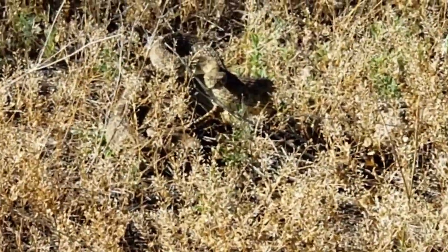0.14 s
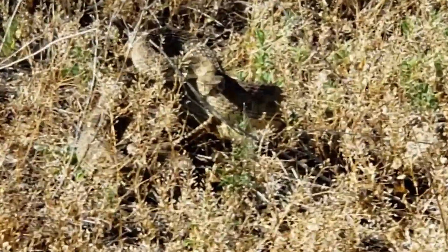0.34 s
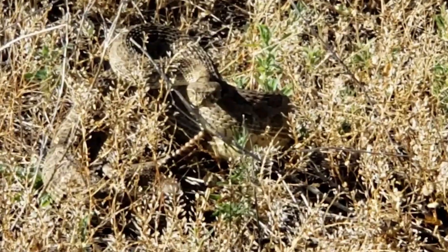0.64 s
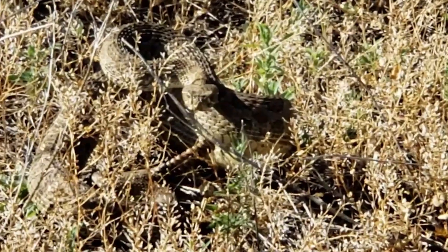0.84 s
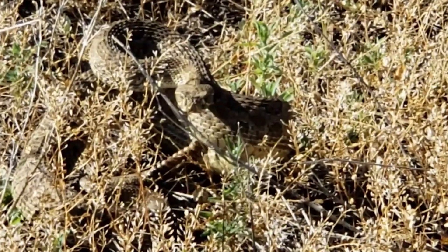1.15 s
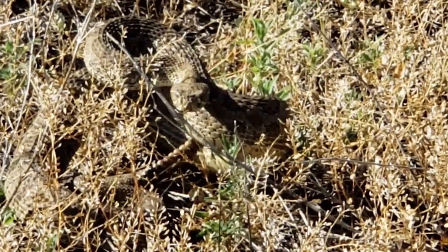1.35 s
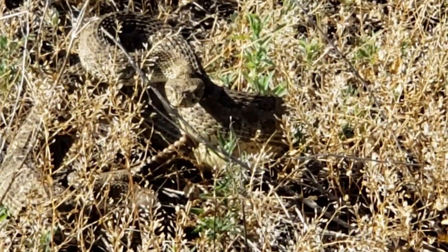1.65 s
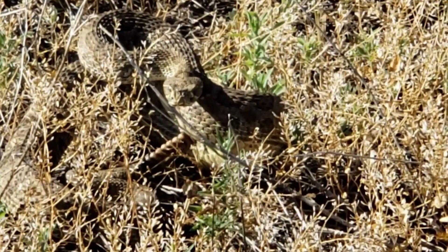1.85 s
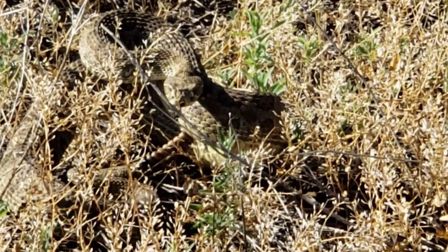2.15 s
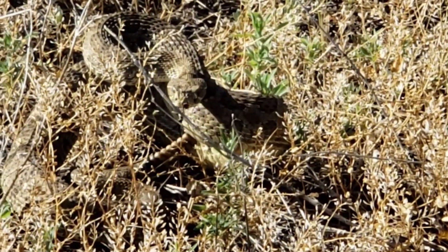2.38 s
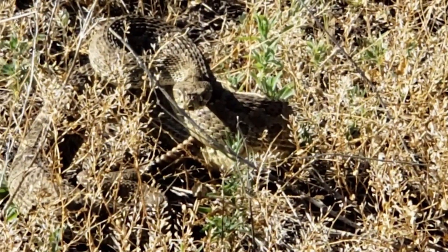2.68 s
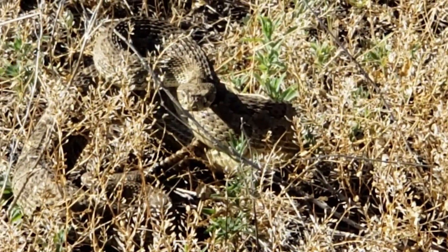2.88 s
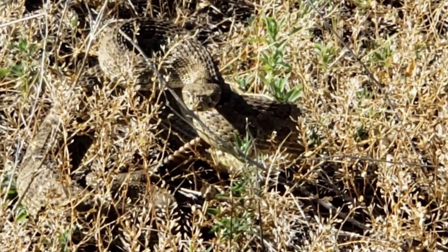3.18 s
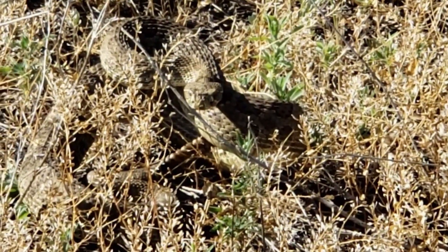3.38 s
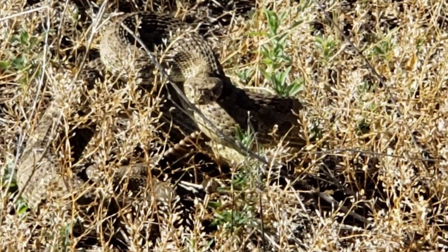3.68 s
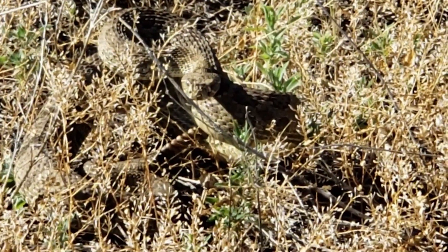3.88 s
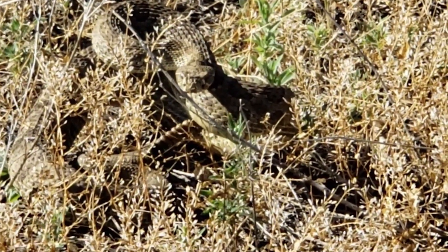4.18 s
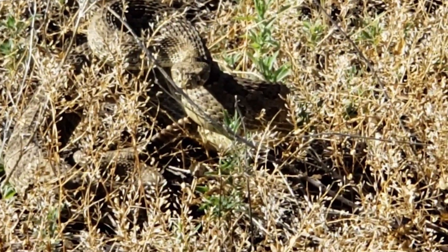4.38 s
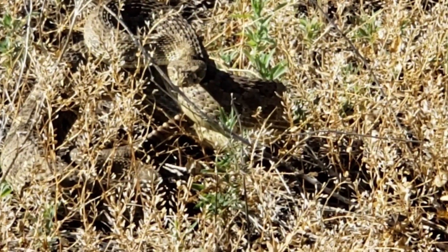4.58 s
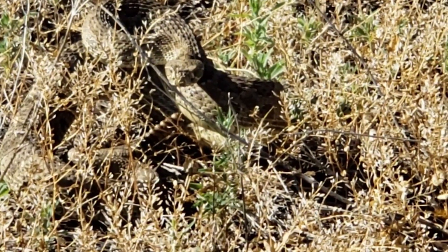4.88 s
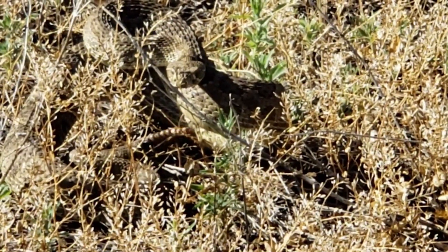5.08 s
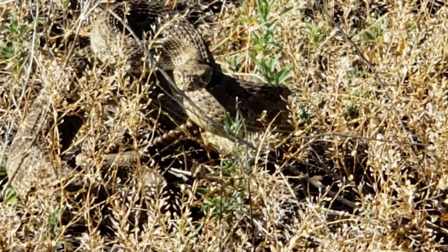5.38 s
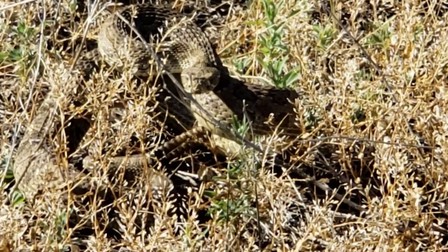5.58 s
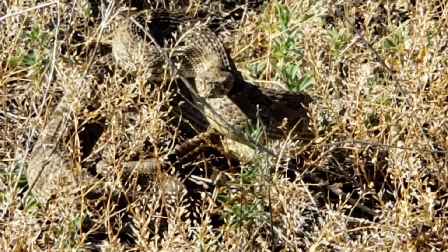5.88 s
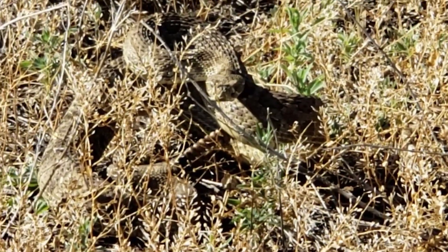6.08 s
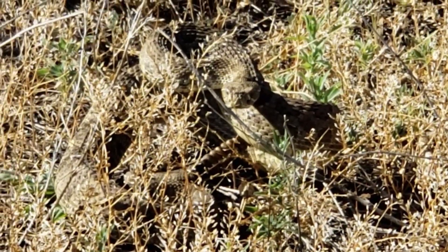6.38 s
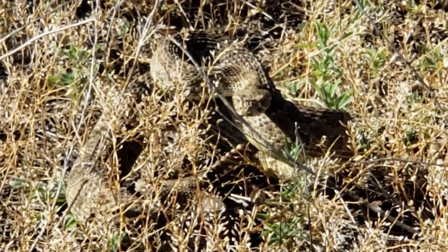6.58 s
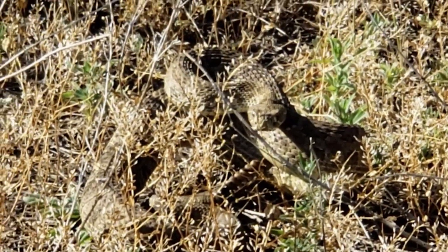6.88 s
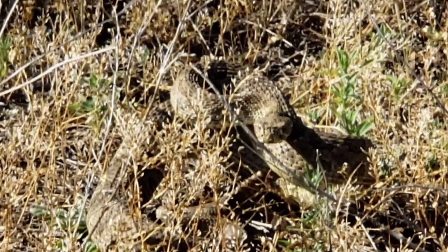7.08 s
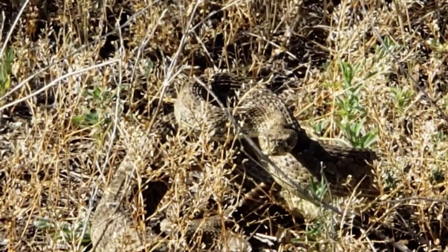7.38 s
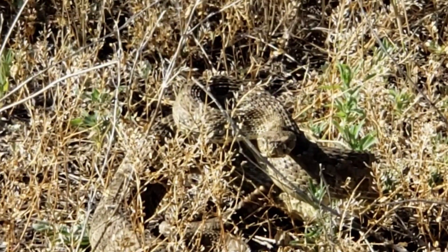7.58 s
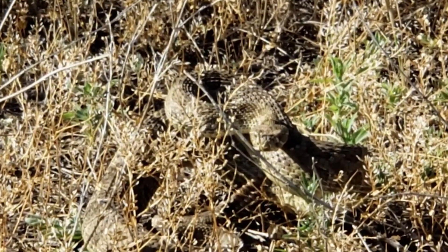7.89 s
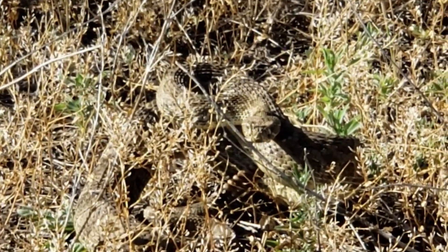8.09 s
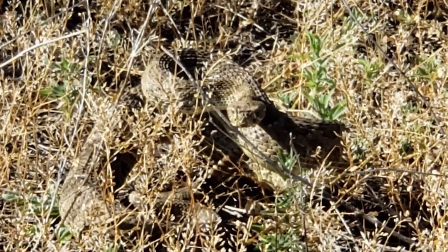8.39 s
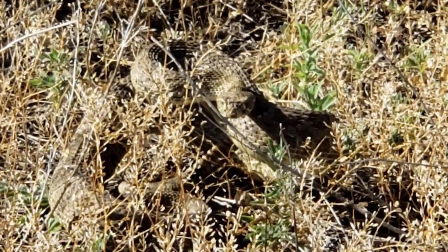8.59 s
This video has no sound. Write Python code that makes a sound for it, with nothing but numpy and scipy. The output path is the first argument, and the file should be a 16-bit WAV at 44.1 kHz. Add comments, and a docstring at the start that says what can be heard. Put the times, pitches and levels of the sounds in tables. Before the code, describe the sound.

Dense, papery clicks blur into an insistent high rattle, with fine treble sizzle spread across stereo. The level sags after four seconds, stutters near five and builds back up. A handheld microphone picks up short grainy friction on the left, then several dry stems snap loudly between about 6.4 and 6.7 seconds. Open, dry outdoor setting, no echo, only slight background hiss.

```python
"""A rattlesnake buzzes its tail in dry grass: loose horny segments collide on every stroke, out and back.
Random clicks bunched on the strokes ring the hollow segments; the buzz flutters, sputters and recovers.
Something rubs briefly by the microphone's left port: grainy noise through the port's resonance.
A few dry stalks snap as ringing cracks, the hand bumps the microphone once, and shaped noise hisses faintly."""
import sys
import numpy as np
from scipy import signal
from scipy.fft import rfft, irfft
from scipy.io import wavfile
from scipy.ndimage import map_coordinates

SR = 44100
rng = np.random.default_rng(int(sys.argv[2]) if len(sys.argv) > 2 else 0)


def bounce(signal):
    """Save signal as a 16-bit WAV file at the path given by the first command-line argument."""
    frames = np.transpose(np.atleast_2d(signal))
    limited = np.clip(frames, -1, 1)
    pcm = np.round(limited * 32767).astype(np.int16)
    wavfile.write(sys.argv[1], SR, pcm)


N = 385830

# Effort of the tail. Each row: time in seconds, buzz level in dB, treble level in dB, both before trims.
EFFORT = [(0.0, -29, -31), (0.3, -28.5, -30.5), (0.43, -26.3, -29), (0.63, -28.6, -31.0), (0.8, -26.5, -28),
          (1.73, -27.5, -29.5), (2.46, -28.5, -29.5), (3.53, -29.5, -31), (4.1, -35, -35.5),
          (4.79, -35.5, -34.1), (5.93, -30.5, -32), (6.7, -28, -29.5), (7.13, -28.5, -31.5),
          (7.2, -27, -30), (8.1, -28.5, -31), (8.23, -29.5, -33), (8.75, -31.5, -32.0)]
# Buzz left running as the tail stalls and picks up again. Each row: time in seconds, level in dB.
STALL = [(4.93, -1), (4.98, -8), (5.05, -24), (5.25, -20), (5.5, -14.5), (5.575, -3)]
SPLIT_HZ = 9660  # the sizzle lies above
HOLLOW_HZ = 1610  # resonance in rubs and snaps


def from_db(db):
    """Decibels to amplitude gain."""
    return 10 ** (np.asarray(db) / 20)


def rms_one(x):
    """Scale to unit power."""
    return x / np.sqrt(np.mean(x ** 2) + 1e-20)


def seconds():
    """Time of every sample."""
    return np.arange(N) / SR


def bins_hz():
    """Frequency of every bin."""
    return np.arange(N // 2 + 1) * SR / N


def in_time(rows):
    """Each column of a curve, interpolated at every sample."""
    s, *columns = np.transpose(rows)
    return [np.interp(seconds(), s, c) for c in columns]


def in_frequency(rows):
    """Each column of a spectrum, interpolated over log frequency at every bin."""
    hz, *columns = np.transpose(rows)
    return np.array([np.interp(np.log(bins_hz() + 1), np.log(hz), c) for c in columns])


def drift(rate_hz):
    """Smooth random curve of unit power, with rate_hz knots per second."""
    knots = rng.standard_normal(int(N / SR * rate_hz) + 2)
    return rms_one(map_coordinates(knots, [seconds() * rate_hz], order=2, mode="nearest"))


def resonate_twice(x, hz, width_hz):
    """Two equal resonances in series, each with about unit gain at its peak."""
    r = np.exp(-np.pi * width_hz / SR)
    b = np.array([1, 0, -1]) * (1 - r * r) / 2
    a = [1, -2 * r * np.cos(2 * np.pi * hz / SR), r * r]
    for _ in range(2):
        x = signal.lfilter(b, a, x + 1e-18)
    return x


def resonate(x, hz, width_hz):
    """One resonance with about unit gain at its peak."""
    r = np.exp(-np.pi * width_hz / SR)
    b = np.array([1, 0, -1]) * (1 - r * r) / 2
    a = [1, -2 * r * np.cos(2 * np.pi * hz / SR), r * r]
    return signal.lfilter(b, a, x + 1e-18)


def high_pass_twice(x, hz):
    """Two second-order high-passes in series."""
    sos = signal.butter(2, hz, "high", fs=SR, output="sos")
    return signal.sosfilt(sos, signal.sosfilt(sos, x))


def low_pass(hz, order):
    """Gain at every bin of a roll-off above hz."""
    return 1 / np.sqrt(1 + (bins_hz() / hz) ** (2 * order))


def rattle(body_db=0.47, low_hz=2350, knock_hz=3420, knock_growth=0.85):
    """The main buzz: segments knock together on every stroke; harder strokes favour the low register."""
    level_db, _ = in_time(EFFORT)
    vigour_db = level_db - level_db.mean()
    clicks = collisions(vigour_db, per_s=3400, stroke_db=2.0, lopsided_db=0.5, scatter=0.83)
    register = low_pass(SPLIT_HZ, order=12) * np.sqrt(1 - low_pass(low_hz, order=6) ** 2)
    sound = radiate(clicks, register)
    knock = irfft(rfft(sound) * low_pass(knock_hz, order=14) ** 2, N)
    knock_gain = from_db(knock_growth * np.minimum(vigour_db, 2))
    return (sound + knock * (knock_gain - 1)) * from_db(level_db + body_db)


def collisions(vigour_db, per_s, stroke_db, lopsided_db, scatter, size_db=2.5, uneven_db=0.85, locking=0.14):
    """Two click trains with shared moments and unrelated signs, bunched on both strokes of each swing."""
    # Each row: time in seconds, full swings of the tail per second.
    swing_curve = [(0, 63.8), (.75, 63.5), (2.25, 61), (3.75, 57.8), (4.8, 55), (5.25, 55.8), (6.25, 60),
                   (7.25, 61.2), (8.75, 59)]
    swing_hz, = in_time(swing_curve)
    phase = 2 * np.pi * np.cumsum(swing_hz) / SR + 0.063 * drift(25)
    # a vigorous tail throws its segments more in step
    in_step = np.clip(0.5 + locking * vigour_db, 0.2, 1.5)
    stroke = stroke_db * np.cos(2 * phase) + lopsided_db * np.cos(phase)
    force = from_db(in_step * stroke + uneven_db * drift(170))
    struck = rng.random(N) < per_s / SR
    hits = struck * from_db(size_db * np.clip(rng.standard_normal(N), -2, 2))
    clicks = rms_one(hits * rng.choice([-1, 1], (2, N)))
    # the grass scatters part of each click into a smooth hiss
    return rms_one(force * (clicks + scatter * rng.standard_normal((2, N))))


def radiate(clicks, register):
    """Clicks ring one register of the hollow segments and reach both ears through the grass; unit level."""
    # Hollow segments. Each row: frequency in Hz, left gain in dB, right gain in dB.
    shell = [(2240, -24, -37.5), (2740, -19, -22.5), (3067, -19.5, -18.5), (3670, -10.5, -7),
             (4277, 0, -3.5), (5860, 0, 0.3), (6420, -1.5, -4.5), (7264, 2.5, -9.5), (8190, -16.5, -14.5),
             (8780, -16.5, -18.5), (10480, -12.5, -10), (11240, -17, -6), (12070, -7, 0), (15900, -5.5, -8)]
    # Each row: frequency in Hz, left-right likeness from 0 to 1.
    likeness = [(2200, 0.95), (3000, 0.87), (5500, 0.88), (7300, 0.61), (9000, 0.36), (12000, 0.34),
                (15500, 0.12)]
    # Where the microphone is held. Each row: time in seconds, place (limited to 1 .. -1 below).
    place_curve = [(0, 0.23), (.5, 0.92), (1, 1), (1.6, 0.72), (2.7, .65), (5, -0.2), (6, -0.3),
                   (7.4, -1.1)]
    # Ground reflections at place 1, sign reversed at -1. Each row: frequency in Hz, gain in dB.
    ground = [(3800, -1.5), (4800, 0.35), (5400, 0), (6100, -2.5), (7000, 1), (7700, 3), (8900, -2.5),
              (10500, 2.5), (11500, .5), (12600, -1.5), (13600, -1), (15300, 1)]
    mid, side = rfft(clicks)
    alike = in_frequency(likeness)
    ears = np.sqrt(1 + alike) * mid + np.sqrt(1 - alike) * side * [[1], [-1]]
    sound = ears * from_db(in_frequency(shell)) * register
    place, = in_time(place_curve)
    share = np.clip((1 + place) / 2, 0, 1)
    ground_db = in_frequency(ground)
    at_plus, at_minus = [irfft(sound * from_db(sign * ground_db) * stalks(), N) for sign in (1, -1)]
    out = share * at_plus + (1 - share) * at_minus
    return out / out.mean(axis=0).std()


def stalks(strength=0.23, reach_s=0.004, count=30):
    """Many faint, early echoes from the stalks ripple the spectrum."""
    echoes = np.zeros(N)
    delays = (rng.uniform(0.15, 1, count) * reach_s * SR).astype(int)
    echoes[delays] = rng.choice([-1, 1], count) * strength / np.sqrt(count)
    return 1 + rfft(echoes)


def flutter(rate_hz=19.38, crest_s=3.825, jitter_s=0.0029, uneven=0.69, limp=0.56, sag=0.033):
    """Level swing in dB: alternate dips deeper, deep beats better timed, faded out with the running buzz."""
    # Deepest where the tail slackens. Each row: time in seconds, depth in dB (negative inverts the swing).
    depth_curve = [(0, -0.2), (3.2, -0.1), (3.85, 0.8), (4.15, 4), (4.45, 2), (4.7, 3.5), (4.9, 1.5),
                   (5.7, 2), (6.5, 0), (8.1, -0.5), (8.6, 1.4)]
    (depth_db,), (running_db,) = in_time(depth_curve), in_time(STALL)
    late_s = jitter_s * drift(rate_hz) / np.maximum(depth_db, 0.5)
    phase = 2 * np.pi * rate_hz * (seconds() - crest_s - late_s)
    beat = np.cos(phase) + limp * np.sin(phase / 2) - sag
    return from_db(running_db) * depth_db * (1 + uneven * drift(rate_hz)) * beat


def stall():
    """Level swing in dB as the buzz gives way to separate, bell-shaped sputters."""
    # Each row: centre in seconds, strength in dB relative to the buzz, two-sigma half-length in seconds.
    sputter_rows = [(5.016, -1.5, 0.026), (5.081, -2, 0.014), (5.109, -6.5, 0.019), (5.173, -1.5, 0.03),
                    (5.243, 4.5, 0.02), (5.302, 3, 0.019), (5.356, -0.5, 0.026), (5.41, 0.5, 0.017),
                    (5.478, -1.5, 0.03), (5.532, -1.2, 0.02)]
    t = seconds()
    running_db, = in_time(STALL)
    sputters = sum(from_db(db) * np.exp(-2 * ((t - s) / length_s) ** 2) for s, db, length_s in sputter_rows)
    return 20 * np.log10(np.hypot(from_db(running_db), sputters))


def sizzle(swell_db, steady=0.1, gain_db=2.15):
    """Lightest touches give a fine treble; a steady share of their power ignores the swell."""
    # Each row: time in seconds, left-right difference in dB.
    pan_curve = [(0, -0.3), (1.5, 1.9), (4, -1), (6.6, -0.7), (8.75, -0.2)]
    _, level_db = in_time(EFFORT)
    pan_db, = in_time(pan_curve)
    vigour_db = level_db - level_db.mean()
    clicks = collisions(vigour_db, per_s=6000, stroke_db=1.5, lopsided_db=1.1, scatter=0.74)
    swell = np.sqrt(steady + (1 - steady) * from_db(swell_db) ** 2)
    ears = from_db(np.array([[1], [-1]]) * pan_db / 2)
    treble = np.sqrt(1 - low_pass(SPLIT_HZ, order=12) ** 2)
    return rms_one(radiate(clicks, treble) * ears) * swell * from_db(level_db + gain_db)


def rubs(width_hz=850, grain_db=1.0, right_db=-33, low_hz=820):
    """Grainy friction by the left port, coloured by the hollow of the port."""
    # Each row: crest in seconds, rise and fall in seconds (one sigma each), left level in dB.
    rub_rows = [(5.966, 0.0075, .011, -25.5), (6.026, 0.0023, 0.0088, -41), (6.044, 0.014, 0.015, -32),
                (6.128, 0.026, 0.015, -42), (6.2, 0.015, .015, -41), (6.232, 0.013, 0.015, -33.5),
                (6.305, 0.0066, 0.012, -37.5), (6.935, .015, 0.029, -50), (7.071, 0.005, 0.0071, -42.5)]
    t = seconds()
    pressure = np.zeros(N)
    for s, rise_s, fall_s, db in rub_rows:
        width_s = np.where(t < s, rise_s, fall_s)
        pressure += from_db(db) * np.exp(-0.5 * ((t - s) / width_s) ** 2)
    friction = rng.standard_normal(N) * from_db(grain_db * drift(500))
    sound = high_pass_twice(resonate_twice(friction, HOLLOW_HZ, width_hz), low_hz)
    return pressure * rms_one(sound) * from_db([[0], [right_db]])


def snaps(width_hz=650, hollow_width_hz=1060, splinter=0.29, splinter_s=0.0012, low_hz=1250):
    """Each dry stalk gives one sharp crack and about a millisecond of splintering, ringing two resonances."""
    # Each row: start in seconds, peak in dB before pan, pitch in Hz, hollow share in dB, left-right in dB.
    snap_rows = [(.1595, -30, 1920, 5, 4), (6.211, -23.5, 4060, -25, 28), (6.434, -8, 3260, -31, 1),
                 (6.6456, -7.5, 3050, -6.5, 7), (6.665, -25, 2500, -13, 4),
                 (6.7142, -11.5, 3260, -8.5, 4.5), (7.886, -22.5, 3070, -10, 16.5)]
    out, t = np.zeros((2, N)), np.arange(SR // 40) / SR
    for s, db, hz, hollow_db, pan_db in snap_rows:
        crack = splinter * rng.standard_normal((2, len(t))) * np.exp(-t / splinter_s)
        crack[:, 0] = 1
        stalk = high_pass_twice(resonate(crack, hz, width_hz), low_hz)
        hollow = high_pass_twice(resonate(crack, HOLLOW_HZ, hollow_width_hz), low_hz)
        sound = stalk / np.abs(stalk).max() + from_db(hollow_db) * hollow / np.abs(hollow).max()
        ears = from_db(db + np.array([[1], [-1]]) * pan_db / 2)
        at = round(s * SR)
        out[:, at:at + len(t)] += sound / np.abs(sound).max() * ears
    return out


def bump(at_s=0.158, peak_db=-56, hz=560, width_hz=290):
    """The hand bumps the microphone housing softly: one dull, quickly damped knock."""
    push = np.arange(N) == round(at_s * SR)
    knock = resonate_twice(push, hz, width_hz)
    return knock / np.abs(knock).max() * from_db(peak_db)


def hiss():
    """Faint shaped noise with a hump in mid-spectrum, independent in each ear and slowly fading."""
    # Each row: frequency in Hz, left and right density in dB per Hz before the fade.
    spectrum = [(60, -138, -138), (200, -135, -135), (342, -131, -131), (430, -119, -119),
                (595, -112, -112), (800, -96.5, -99.6), (1100, -100, -99.5), (1307, -94, -99),
                (1468, -83, -90.5), (1773, -85, -95), (1990, -95.5, -101.5), (3030, -96, -98)]
    # Each row: time in seconds, level in dB.
    fade = [(0, 1.6), (7.3, -0.5), (8.75, -3.5)]
    level_db, = in_time(fade)
    noise = irfft(rfft(rng.standard_normal((2, N))) * from_db(in_frequency(spectrum)), N)
    return noise * np.sqrt(SR / 2) * from_db(level_db)


def scene():
    """The snake, the small noises near the microphone and the hiss."""
    flutter_db, stall_db = flutter(), stall()
    buzz = rattle() * from_db(flutter_db + stall_db)
    # the sizzle follows only a share of the sputters' rise and fall
    snake = buzz + sizzle(flutter_db + 0.15 * stall_db)
    return snake + rubs() + snaps() + bump() + hiss()


def record(dry):
    """Cut the top steeply above 15.9 kHz."""
    return irfft(rfft(dry) * low_pass(15900, order=200), N)


dry = scene()
out = record(dry)
bounce(out)
```